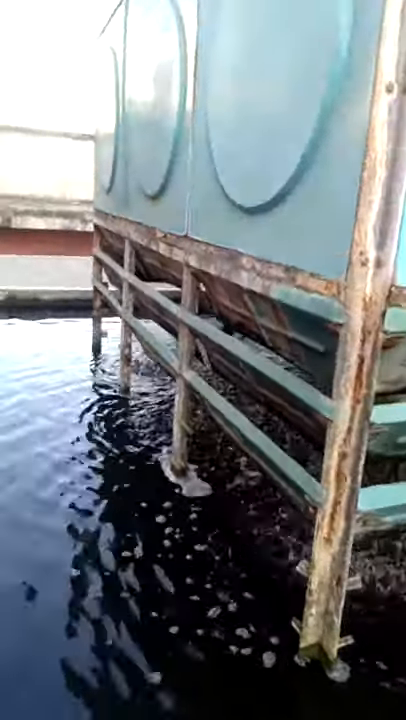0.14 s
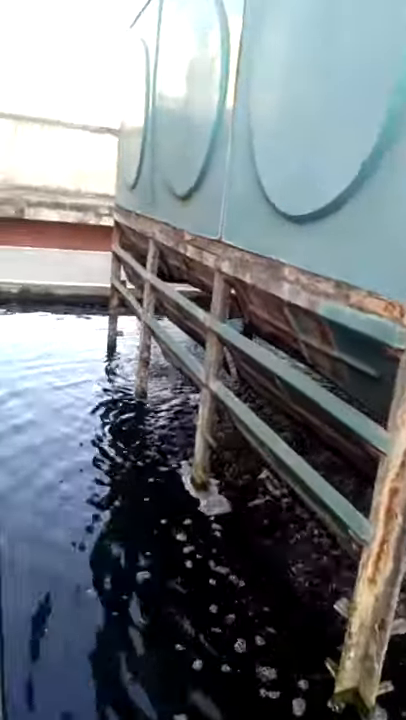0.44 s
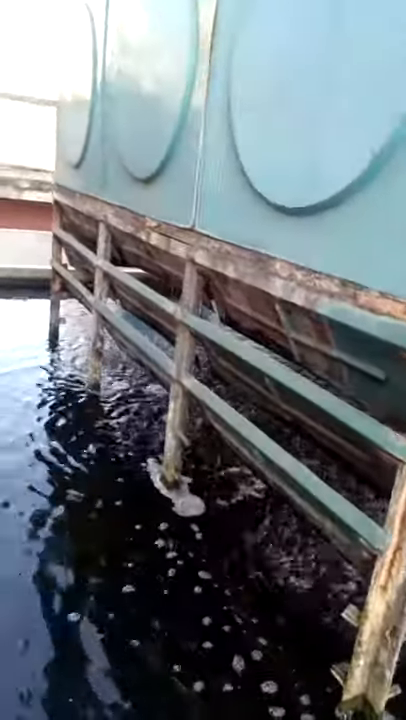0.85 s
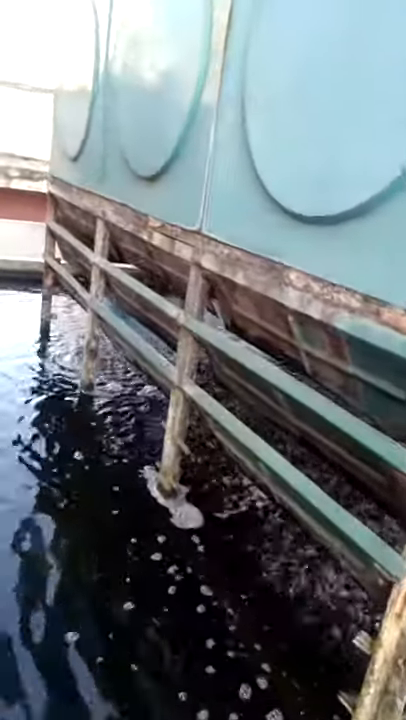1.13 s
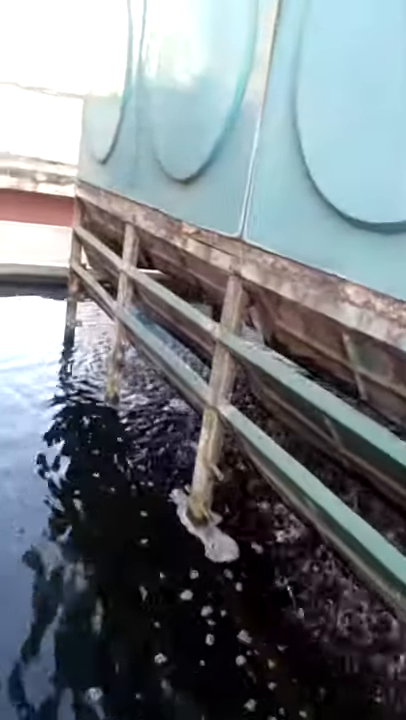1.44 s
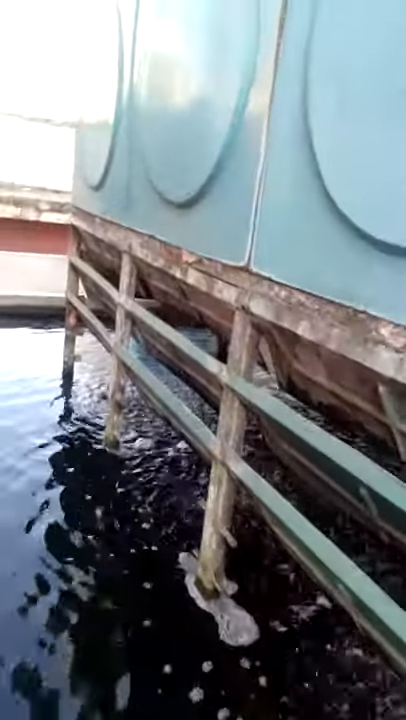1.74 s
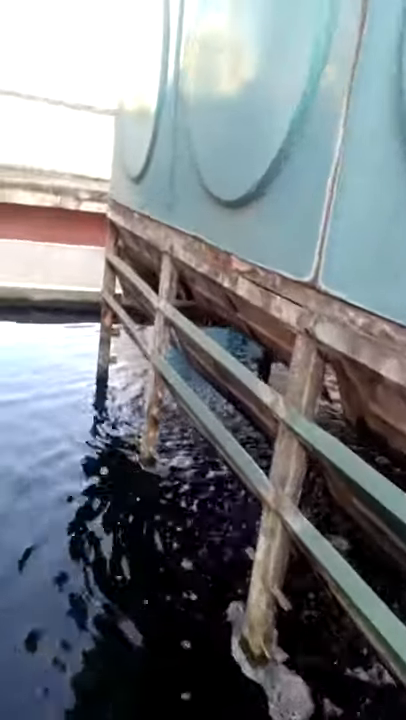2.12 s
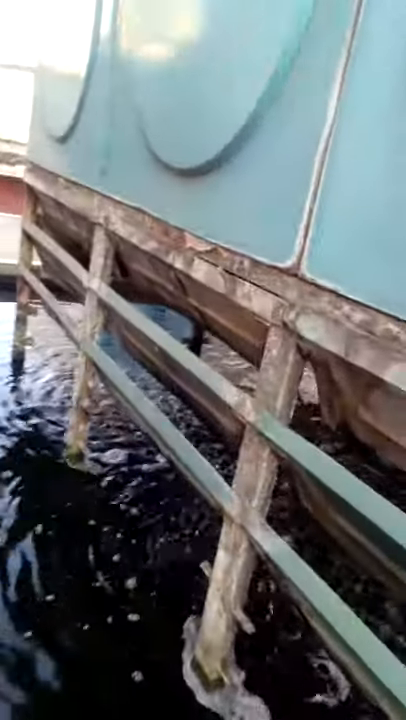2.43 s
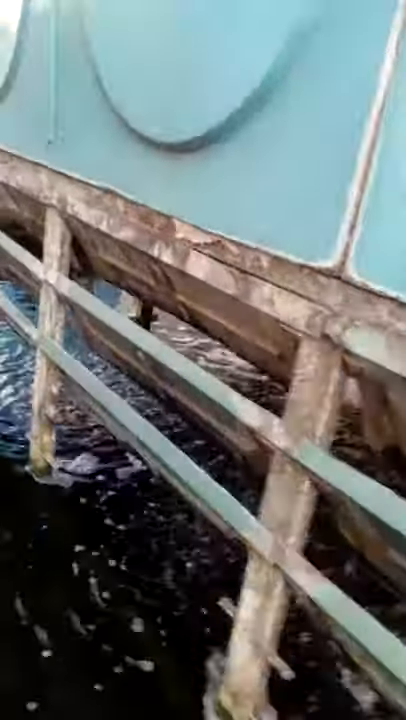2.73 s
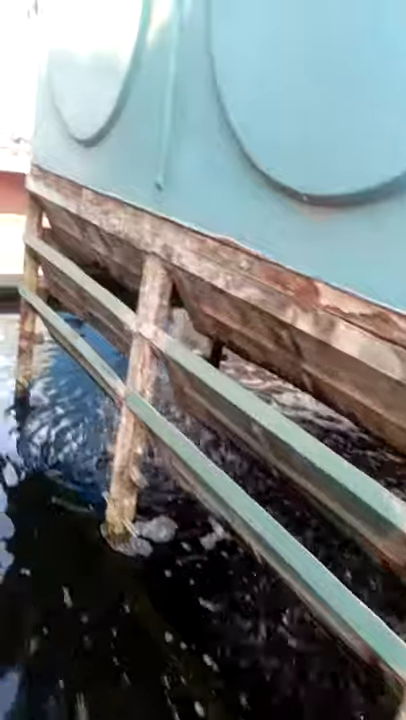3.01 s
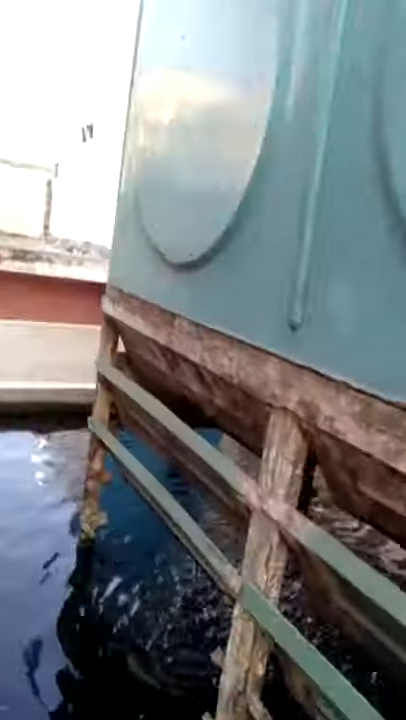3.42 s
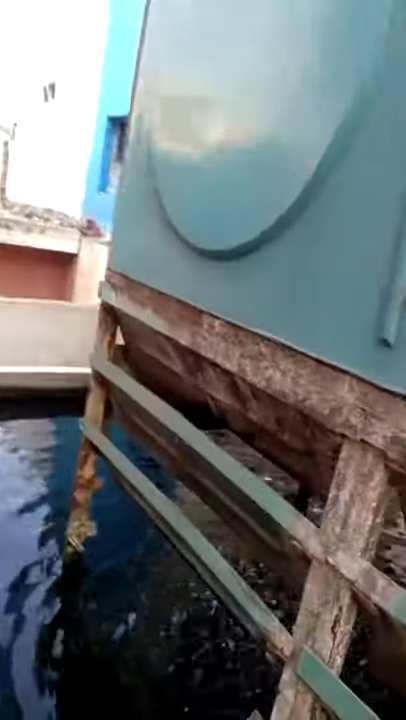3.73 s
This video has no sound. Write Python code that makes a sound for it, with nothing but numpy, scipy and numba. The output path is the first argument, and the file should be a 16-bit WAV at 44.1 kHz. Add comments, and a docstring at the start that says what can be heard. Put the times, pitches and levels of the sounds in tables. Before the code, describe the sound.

A cooling tower fan roars and hums steadily over water raining into a basin.

```python
"""Beside a cooling tower

A big fan hums on multiples of its shaft rate, and its turbulent air roars through the casing.
Water rains through the fill into the basin: impacts splash, trapped bubbles ring, and single drops
tick and ping above the rush. The listener walks slowly closer, so the partials of the hum swell and
fade and the water grows. A limiter holds down the peaks."""
import sys
import numpy as np
from scipy import signal
from scipy.fft import rfft, irfft, next_fast_len
from scipy.io import wavfile
from scipy.ndimage import uniform_filter1d, minimum_filter1d
from numba import njit

SR = 44100
rng = np.random.default_rng(int(sys.argv[2]) if len(sys.argv) > 2 else 0)


def wrap_up_sound(samples):
    """Save the sound to the file named by the first command line argument, as 16-bit audio."""
    columns = np.atleast_2d(samples).T
    # keep every value between -1 and 1, then stretch to whole-number steps
    tamed = np.clip(columns, -1, 1)
    steps = np.round(tamed * 32767).astype(np.int16)
    wavfile.write(sys.argv[1], SR, steps)


N = 170226

# Spectrum of the falling water as picked up, with a bright microphone resonance near 9.7 kHz.
# Each row: frequency in Hz, relative density in dB.
WATER_AT_MIC = [(300, -81), (800, -60.5), (1250, -50.5), (1800, -57.5), (2500, -70.5), (3600, -78),
                (5000, -83), (7000, -88.5), (9700, -79), (11500, -88), (13000, -98), (15500, -101)]
# Bands of the small splashes. Each row: lower edge in Hz, upper edge in Hz.
TICK_BANDS = [(3000, 5500), (4500, 9000), (8000, 15000), (11500, 16000), (4000, 16000)]
# Weight of those bands. Each entry: relative gain in dB.
TICK_BAND_DB = (-1, -3, -1, 10, 1)
# The nearest drops. Each row: start in seconds, nominal pitch in Hz, nominal peak in dB,
# relative splash strength from 0 to 1.
NEAR_DROPS = [(0.2621, 11370, -36, 0.32), (0.3639, 8610, -31, 0.2), (0.8545, 8200, -29.5, 0.24),
              (0.8905, 7800, -33, 0.4), (1.1699, 10340, -31, 0.3), (1.386, 5760, -26, 0.27),
              (1.7359, 5800, -32, 0), (1.771, 8270, -34.5, 0.65), (1.7847, 5510, -33, 0.3),
              (1.8647, 7580, -37, 0.1), (1.8984, 5900, -40, 0.45), (2.0028, 6500, -32, 0.29),
              (2.0337, 4030, -23, 0.1), (2.0935, 9650, -27, 0.1), (2.1151, 10680, -29, 0.2),
              (2.1335, 2410, -22, 0.1), (2.1607, 6200, -33, 0), (2.2264, 8270, -34, 0),
              (2.238, 6260, -34, 0.37), (2.2972, 6890, -35, 0), (2.3165, 4850, -30, 0.1),
              (2.3896, 7240, -36, 0.45), (2.449, 9200, -30, 0.5), (2.4833, 9650, -26.5, 0.4),
              (2.5988, 9000, -26, 0), (2.6944, 7920, -33, 0.1), (2.718, 7920, -30, 0.29),
              (2.7225, 3400, -24.5, 0.1), (2.7698, 12750, -40, 0.13), (2.7762, 8100, -26, 0.2),
              (2.8056, 9400, -28, 0.5), (2.8487, 7580, -32, 0.2), (2.8793, 8700, -23, 0.12),
              (2.9858, 6550, -32, 0), (3.0352, 12060, -35, 0.2), (3.059, 5860, -31, 0.4),
              (3.3064, 4200, -29, 0.15), (3.4346, 4000, -26, 0.6), (3.467, 10500, -26.5, 0.43),
              (3.4958, 11370, -35, 0.3), (3.5332, 6200, -37, 0.4), (3.5926, 12060, -34, 0.23),
              (3.741, 3450, -28, 0.1), (3.7869, 8700, -26, 0.13)]
# Balance along the listener's path. Each row: time in seconds, then relative gain in dB of the roar's
# bass, the roar above it, the water's body, its 4 kHz band and its treble.
PATH_GAINS = [(0, 3, -0.31, -1.9, 0, -5), (.6, -3, -0.21, -1.9, 0, -4), (1.2, 1.5, 0.71, -0.051, 0, -2.5),
              (1.8, -2.5, -1.7, -0.43, 0, -3), (2.4, -4, -0.61, 2.3, 0.016, -0.5),
              (2.9, 4, -0.79, 0.63, 0, 0.5), (3.3, -1.5, -0.38, 2.7, 0, 1.5), (3.86, 2.5, 1, 3.5, 0, -0.5)]
# Spectrum of the fan's air and casing. Each row: frequency in Hz, relative density in dB.
ROAR_SPECTRUM = [(20, -48), (43, -68), (60, -44.5), (80, -44), (100, -46), (150, -44), (250, -43.5),
                 (400, -47.5), (700, -49), (1050, -57), (1600, -65.5), (2500, -83), (4000, -100)]
# Peaks and dips in the fan's roar: low shaft throb, rough band around the seventh partial,
# casing resonances. Each row: frequency in Hz, width in Hz, gain in dB.
ROAR_PEAKS_DIPS = [(33.2, 5.5, 12), (86, 27, -4.5), (119.3, 5.1, 6), (150, 14, -0.5), (173.4, 18.6, 10.5),
                   (234.3, 27, 7), (299, 38, 6), (357.5, 21, 4.5), (520.6, 11, 5.5), (737, 90, 1)]
# Partials of the hum. Each entry: multiple of the shaft rate.
HUM_ORDERS = (4, 7, 8, 11, 12, 16)
# Wavering of those partials. Each entry: spread of level in dB.
HUM_WAVER_DB = (1.2, 1.1, 1.2, 1.9, 1.6, 0.67)
# The hum along the path. Each row: time in seconds, then level in dB of multiples 4, 8, 11, 12 and 16.
HUM_LEVELS = [(0, -28, -29, -48.5, -23, -22), (.48, -26.5, -30, -55, -25, -21),
              (.96, -25.5, -24, -39, -25.5, -21.5), (1.45, -27, -29, -33.5, -22, -23.5),
              (1.93, -28, -18.5, -17.5, -19.5, -25.5), (2.41, -27, -20, -45, -19.5, -31),
              (2.9, -29, -17.5, -31, -22.5, -30), (3.38, -21.5, -19.5, -38, -29, -47),
              (3.86, -27, -17, -30, -51, -35)]
# Surges of the seventh multiple. Each row: time in seconds, level in dB.
SEVENTH_SURGES = [(0.0, -35), (0.14, -21.5), (0.41, -34), (1.05, -24), (1.12, -34), (1.18, -23),
                  (1.48, -19), (1.54, -24.5), (1.65, -15), (1.86, -16), (1.95, -28), (2.05, -14),
                  (2.95, -20), (3.12, -40), (3.26, -17), (3.47, -27), (3.62, -13.5), (3.86, -27.5)]

SHAFT_HZ, HUM_WAVER_RAD = 16.306, 0.11
ROAR_DB, WATER_DB = -15, -25
SPRAY_PER_S, TICKS_PER_S = 2500, 300
SMACK_S, TRICKLE_S, TRICKLE_DB = .0014, .008, -7
PING_START_RATIO, PING_CYCLES, RISE_PER_CYCLE = 0.93, 9.6, .012
LIMIT, RELEASE_S, TOP_HZ = .715, 0.06, 15440


def undb(db):
    """Amplitude grows tenfold for every 20 dB."""
    return 10 ** (np.asarray(db) / 20)


def at_level(x, db):
    """Scaling sets the RMS level to db."""
    return x * undb(db) / np.sqrt(np.mean(x ** 2))


def curve(table, k):
    """Linear interpolation gives column k of a time table at every sample."""
    table = np.array(table)
    return np.interp(np.arange(N) / SR, table[:, 0], table[:, k])


def colour(spectrum, hz):
    """A spectral envelope, interpolated in dB over log frequency, gives the gain at hz."""
    points = np.array(spectrum)
    return undb(np.interp(np.log(hz + 1), np.log(points[:, 0]), points[:, 1]))


def wander(rate_hz):
    """Random steps, smoothed twice, make a modulation with a spread near 1."""
    hold = int(SR / rate_hz)
    steps = np.repeat(rng.standard_normal(N // hold + 1), hold)
    return 1.3 * uniform_filter1d(uniform_filter1d(steps, hold), hold)[:N]


def flicker(rate_hz):
    """Subtracting the running mean leaves only the fast part of a modulation."""
    quick = wander(rate_hz)
    return quick - uniform_filter1d(quick, size=SR // 6)


def octave_bands(x, gain, band_db):
    """A filter bank splits x, coloured by gain(hz), into octaves, each scaled by band_db(centre)."""
    size = next_fast_len(N)
    hz = np.arange(size // 2 + 1) * SR / size
    spectrum, out = rfft(x, size) * gain(hz), 0
    for centre in 32 * 2. ** np.arange(10):
        share = np.cos(np.pi / 2 * np.clip(np.log2((hz + 1) / centre), -1, 1)) ** 2
        out = out + irfft(spectrum * share, size)[:N] * undb(band_db(centre))
    return out


def scatter(per_s, spread_db):
    """Independent events have random starts, sizes with a loud tail, and two uniform draws each."""
    when, chance, pitch, ring = rng.random((int(per_s * N / SR), 4)).T
    size = undb(spread_db * np.minimum(-np.log(1 - chance), 4.2))
    return (when * (N - 1)).astype(np.int64), size, pitch, ring


@njit
def bubbles(starts, hz, cycles, size):
    """A bubble is a damped oscillator: it decays by 1/e in the given cycles while its pitch rises."""
    out = np.zeros(N)
    for k in range(len(starts)):
        step = 2 * np.pi * hz[k] / SR
        phase, amplitude, i = 0., size[k], starts[k]
        while amplitude > .003 * size[k] and i < N and step < 2.8:
            out[i] += amplitude * np.sin(phase) * min(phase / 9., 1.)
            phase += step
            amplitude *= np.exp(-step / (2 * np.pi * cycles[k]))
            step *= 1 + RISE_PER_CYCLE * step / (2 * np.pi)
            i += 1
    return out


def splashes(starts, size):
    """Incoherent bursts add in power; each is a sharp smack with a weaker, longer trickle."""
    impacts = np.zeros(N)
    np.add.at(impacts, starts, size ** 2)
    smack, trickle = (signal.lfilter([1], [1, -np.exp(-2 / (decay_s * SR))], impacts)
                      for decay_s in (SMACK_S, TRICKLE_S))
    return np.sqrt(smack + undb(2 * TRICKLE_DB) * trickle) * rng.standard_normal(N)


def falling_water():
    """Countless far drops merge into Gaussian noise, with a patter of small bubbles and splashes."""
    starts, size, pitch, ring = scatter(SPRAY_PER_S, spread_db=1.9)
    spray = bubbles(starts, 2900 + 12000 * pitch, 1.5 + 6 * ring, size)
    ticks = 0
    for band, db in zip(TICK_BANDS, TICK_BAND_DB):
        starts, size, _, _ = scatter(TICKS_PER_S, spread_db=3.8)
        bandpass = signal.butter(2, band, "band", fs=SR, output="sos")
        ticks += undb(db) * signal.sosfilt(bandpass, splashes(starts, size))
    patter = at_level(spray, -5.5) + at_level(ticks, -6)  # relative to the rush
    patter *= undb(2.5 * flicker(28.11))
    shared_flicker = flicker(29.3)
    rush = rng.standard_normal(N)

    def band_db(hz):
        approach = curve(PATH_GAINS, 3 if hz < 4096 else 4 if hz < 8192 else 5)
        treble_flicker = min(hz / 6000, 1) * (0.53 * shared_flicker + 1.3 * flicker(31.01))
        return approach + treble_flicker + 0.61 * wander(7.2)
    water = octave_bands(rush + patter, lambda hz: colour(WATER_AT_MIC, hz), band_db)
    return at_level(water, WATER_DB)


def near_drops():
    """Each impact radiates a broadband splash, and its trapped bubble rings as a short rising ping."""
    start_s, hz, db, splash_strength = np.array(NEAR_DROPS).T
    starts = (start_s * SR).astype(np.int64)
    size = undb(db) / colour(WATER_AT_MIC, hz)  # offsets the colouring below at the nominal pitch
    ping = bubbles(starts, PING_START_RATIO * hz, np.full(len(hz), PING_CYCLES), size)
    splash = splashes(starts, splash_strength * size * undb(7.5))
    bright = signal.sosfilt(signal.butter(3, 2300, "high", fs=SR, output="sos"), ping + splash)
    return octave_bands(bright, lambda f: colour(WATER_AT_MIC, np.maximum(f, 2500)), lambda f: 0)


def fan_roar():
    """Turbulence is broadband noise, here with peaks and dips; its bands swell together and alone."""
    shared_swell = .4 * wander(2.7)

    def gain(hz):
        shape_db = sum(db / (1 + (2 * (hz - f) / width) ** 2) for f, width, db in ROAR_PEAKS_DIPS)
        return colour(ROAR_SPECTRUM, hz) * undb(shape_db)

    def band_db(hz):
        return curve(PATH_GAINS, 1 if hz <= 128 else 2) + shared_swell + .5 * wander(5.23)
    return at_level(octave_bands(rng.standard_normal(N), gain, band_db), ROAR_DB)


def fan_hum():
    """Periodic rotation radiates harmonics of the shaft rate, each wavering in level and phase."""
    shaft_angle = 2 * np.pi * SHAFT_HZ * np.arange(N) / SR
    levels_db = [curve(HUM_LEVELS, k) for k in range(1, 6)]
    levels_db.insert(1, curve(SEVENTH_SURGES, 1))
    hum = 0
    for order, db, waver_db in zip(HUM_ORDERS, levels_db, HUM_WAVER_DB):
        amplitude = np.sqrt(2) * undb(db + waver_db * wander(8))
        phase = order * shaft_angle + 2 * np.pi * rng.random() + HUM_WAVER_RAD * wander(3.94)
        hum += amplitude * np.sin(phase)
    return hum


def scene():
    """By superposition, the pressures of fan and water add in one channel."""
    return (fan_hum() + fan_roar() + falling_water() + near_drops())[None]


@njit
def limiter_gain(peaks, release):
    """A peak follower rises at once and decays slowly; above the limit, gain varies inversely with it."""
    gain, envelope = np.empty(len(peaks)), 0.
    for i in range(len(peaks)):
        envelope = max(peaks[i], envelope * release)
        gain[i] = min(1., LIMIT / (envelope + 1e-9))
    return gain


def record(dry):
    """Look-ahead limiting lowers the gain just before a peak; a steep low-pass then cuts the top."""
    peaks = -minimum_filter1d(-np.abs(dry[0]), size=89)
    gain = uniform_filter1d(limiter_gain(peaks, np.exp(-1 / (RELEASE_S * SR))), size=45)
    lowpass = signal.ellip(14, .3, 80, TOP_HZ, fs=SR, output="sos")
    return signal.sosfilt(lowpass, dry * gain)


dry = scene()
out = record(dry)
wrap_up_sound(out)
```